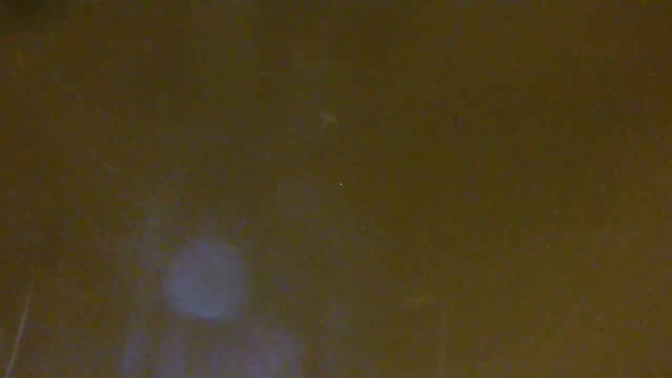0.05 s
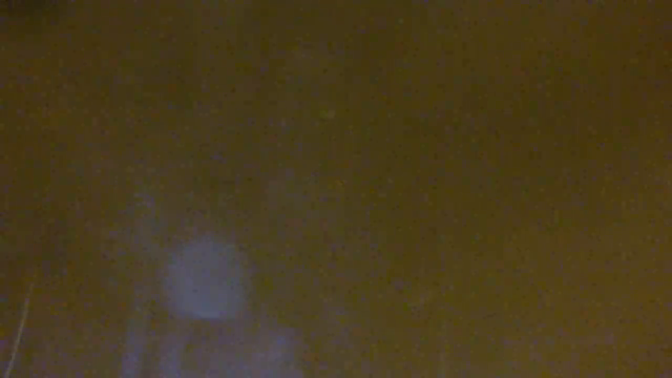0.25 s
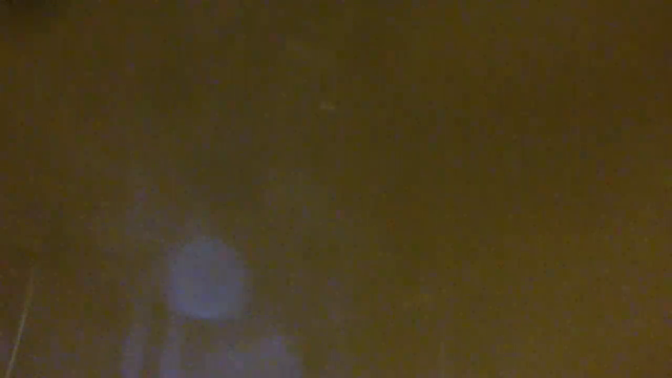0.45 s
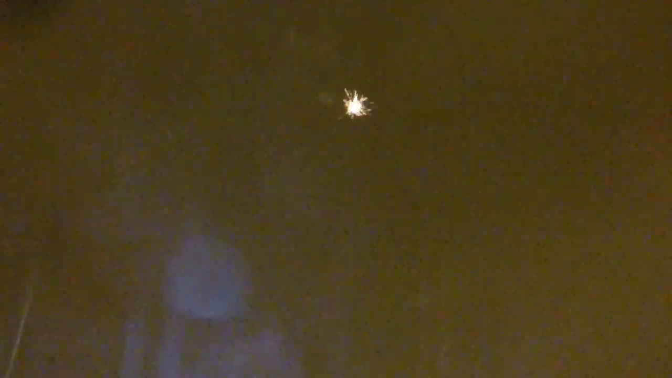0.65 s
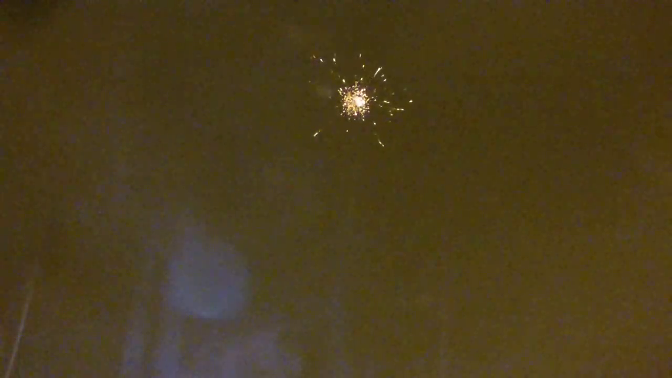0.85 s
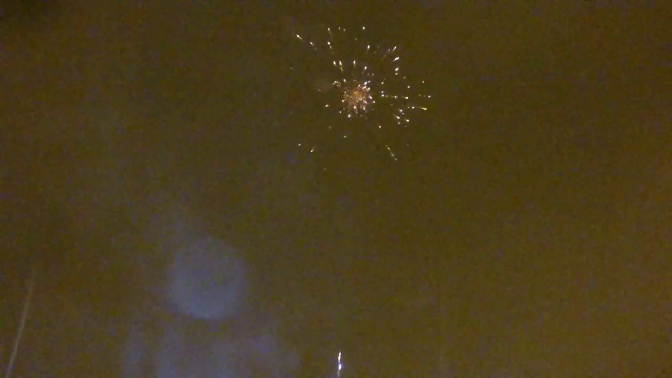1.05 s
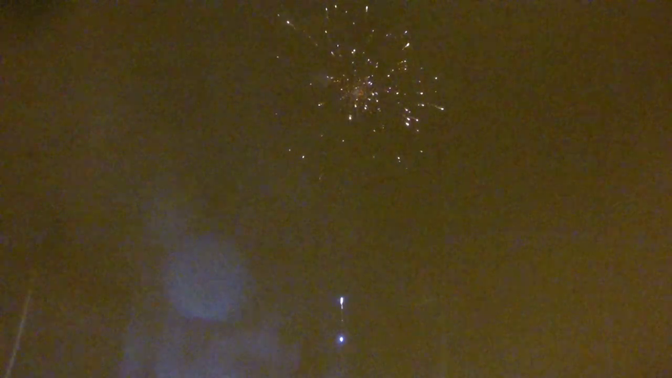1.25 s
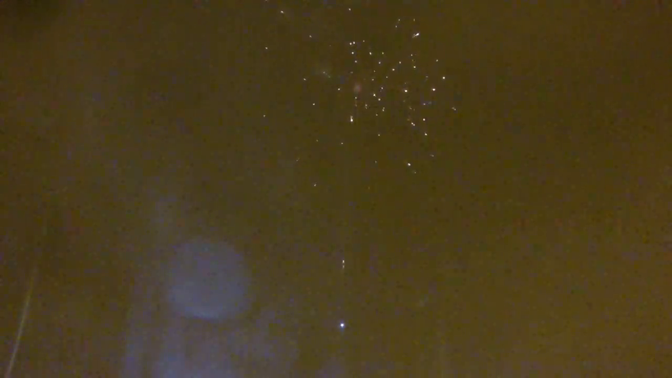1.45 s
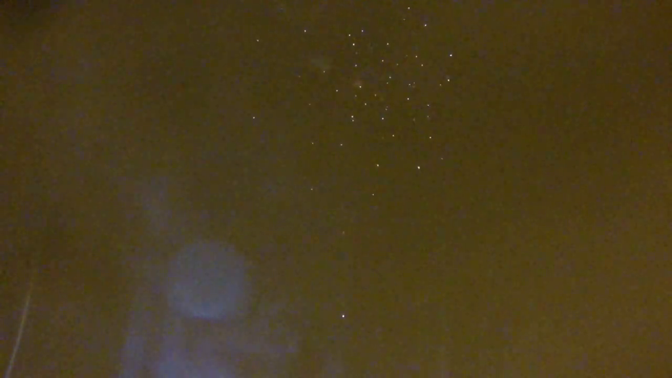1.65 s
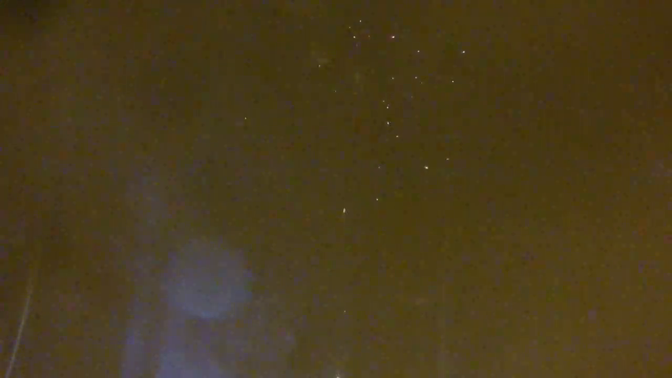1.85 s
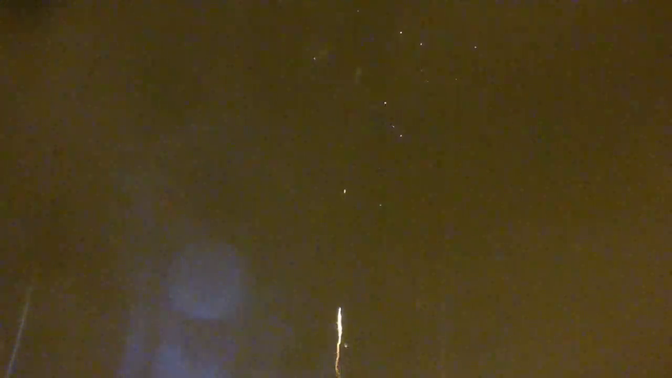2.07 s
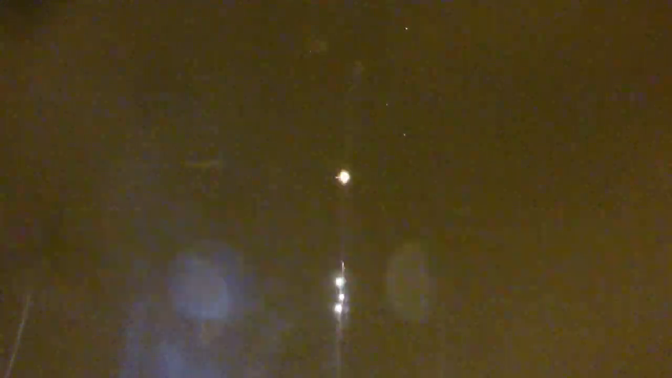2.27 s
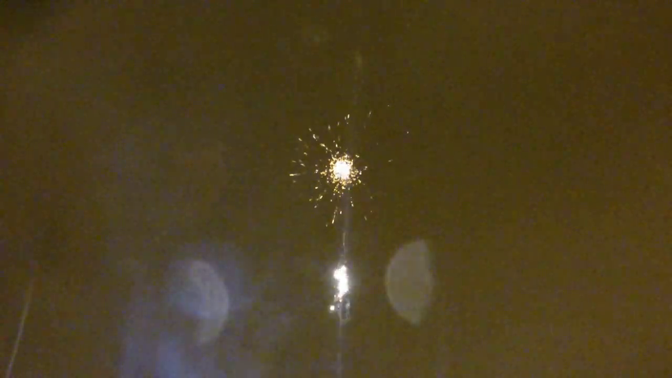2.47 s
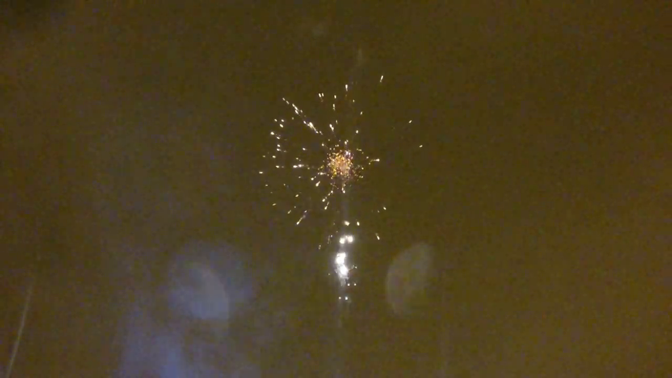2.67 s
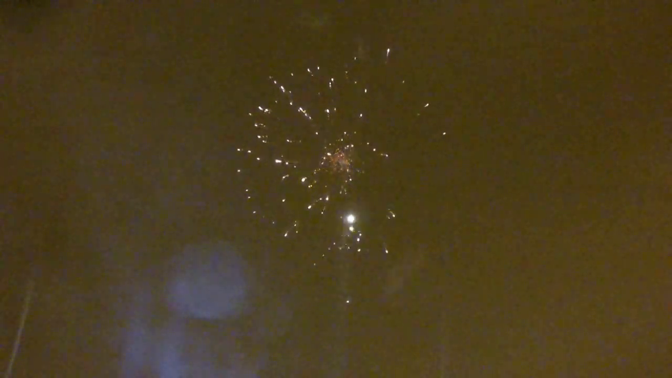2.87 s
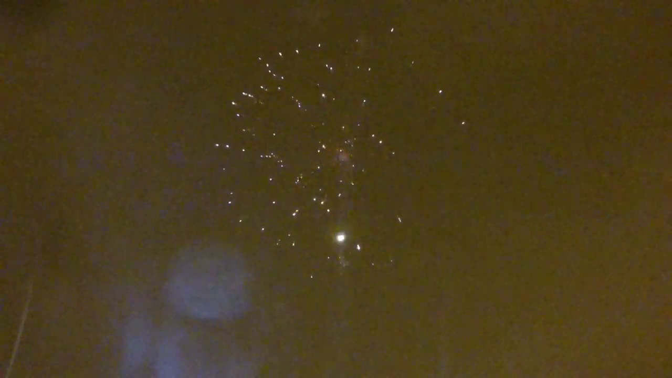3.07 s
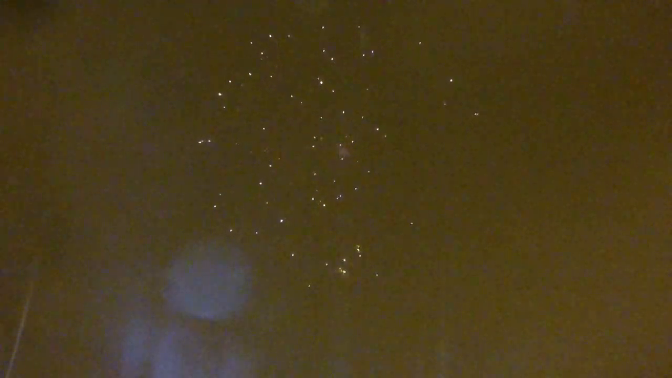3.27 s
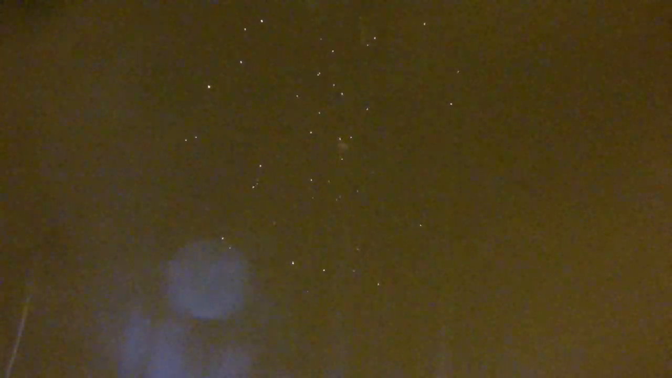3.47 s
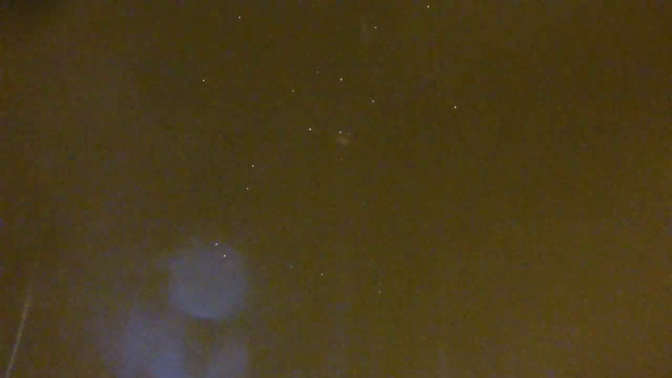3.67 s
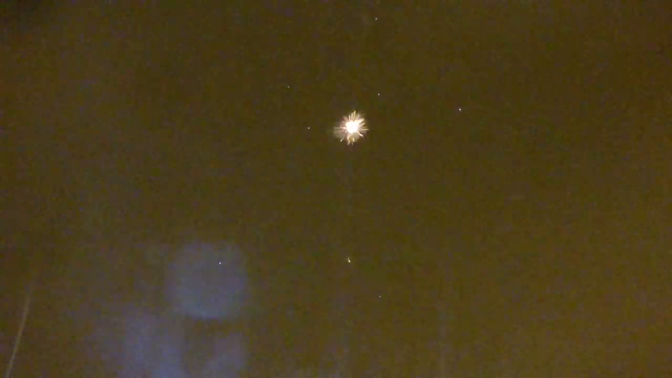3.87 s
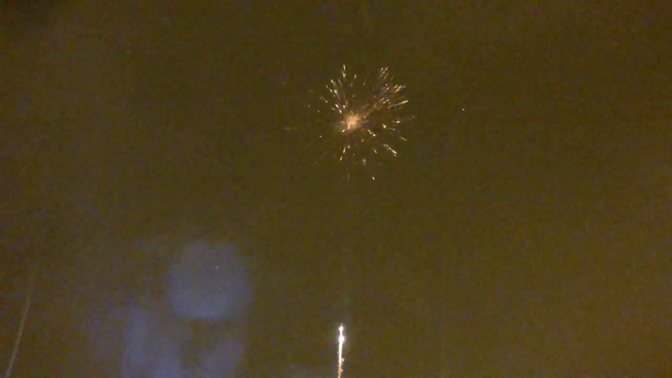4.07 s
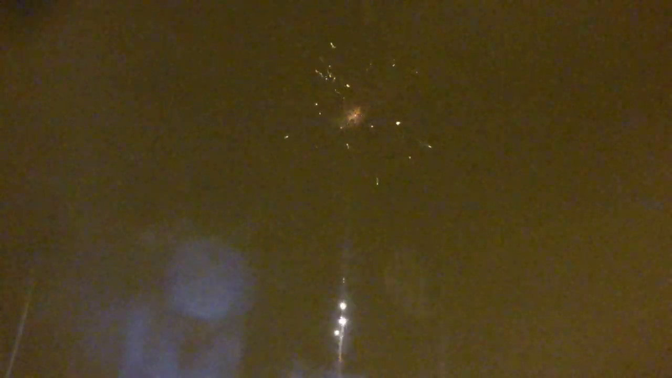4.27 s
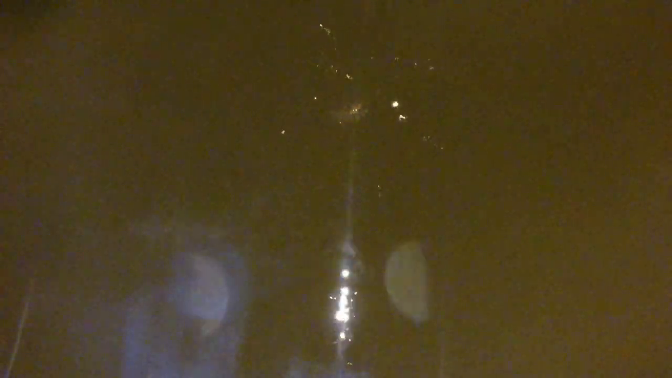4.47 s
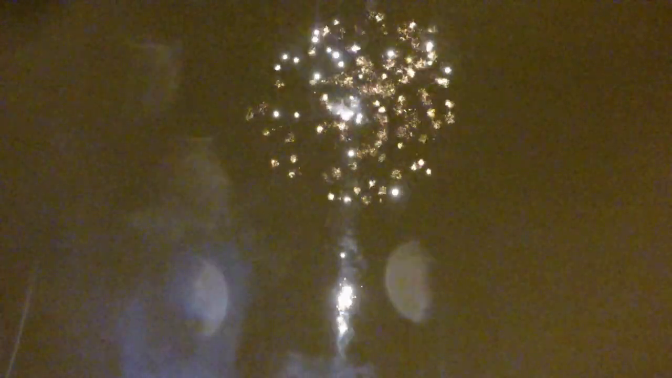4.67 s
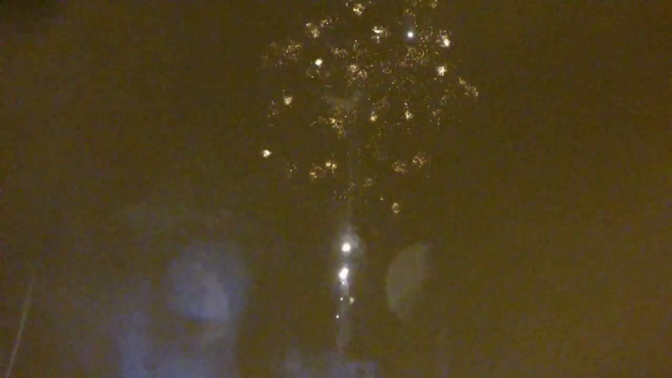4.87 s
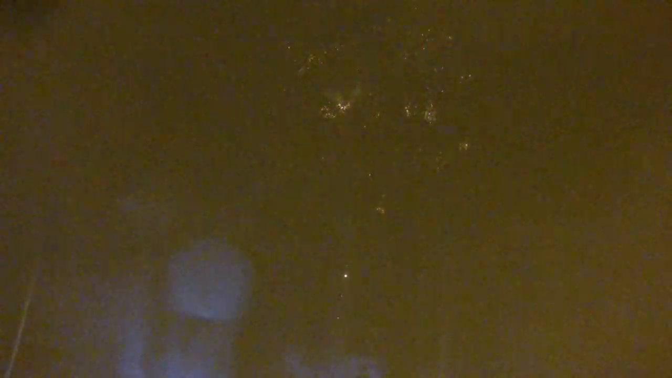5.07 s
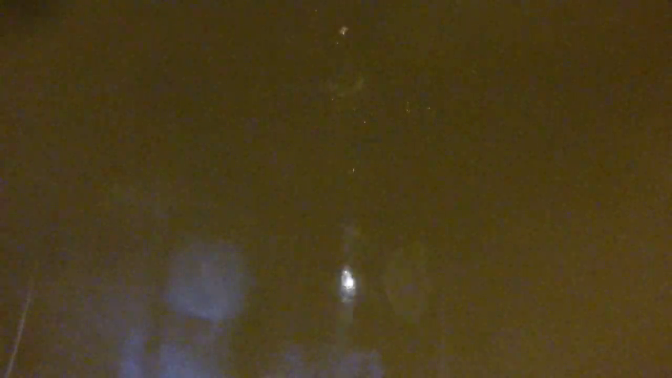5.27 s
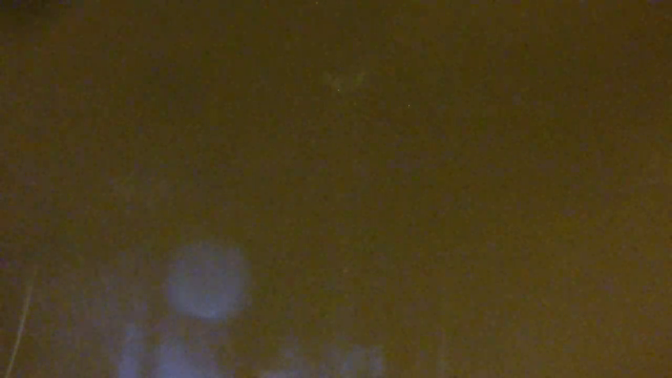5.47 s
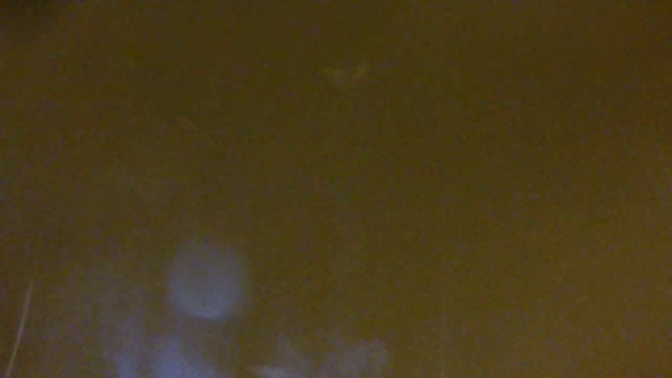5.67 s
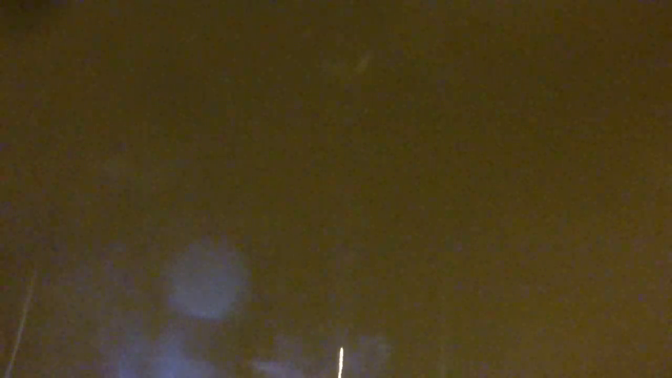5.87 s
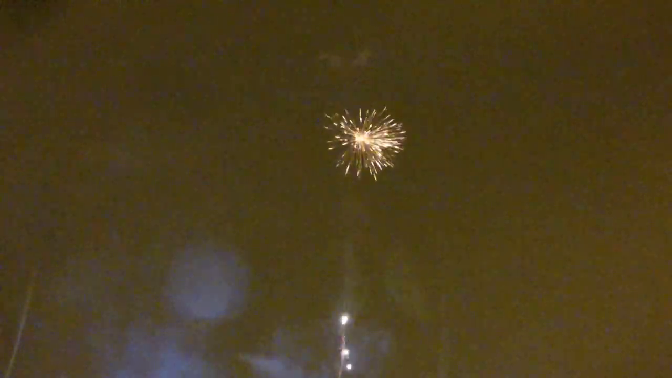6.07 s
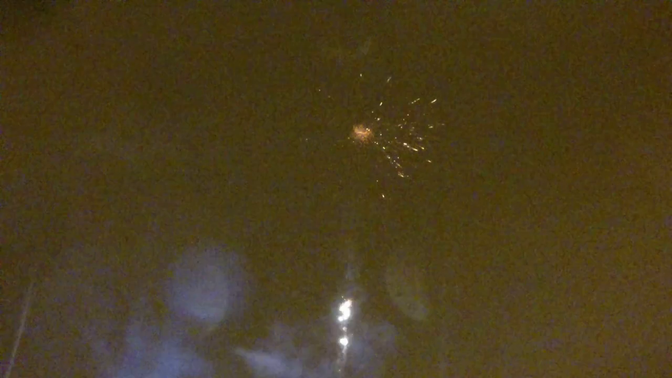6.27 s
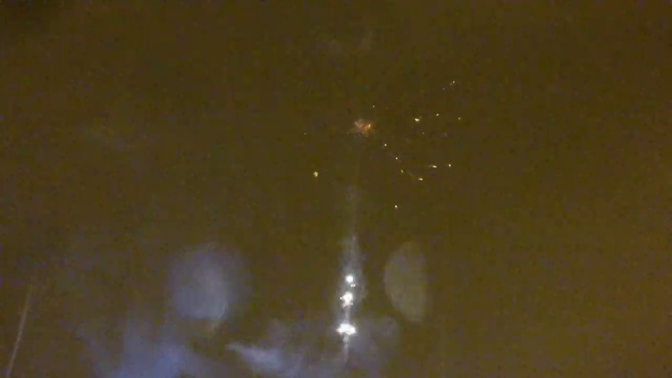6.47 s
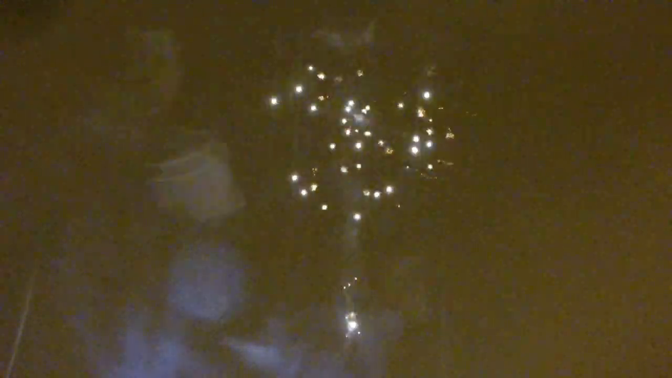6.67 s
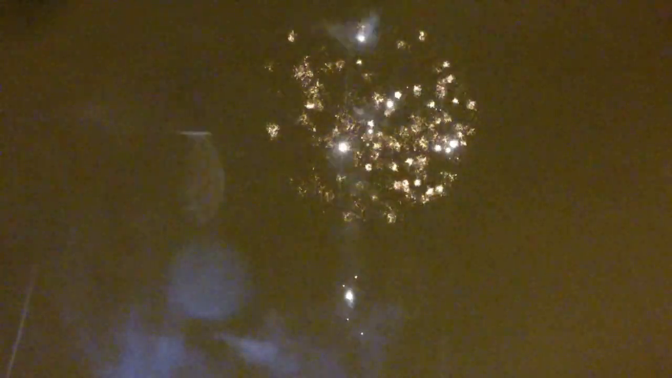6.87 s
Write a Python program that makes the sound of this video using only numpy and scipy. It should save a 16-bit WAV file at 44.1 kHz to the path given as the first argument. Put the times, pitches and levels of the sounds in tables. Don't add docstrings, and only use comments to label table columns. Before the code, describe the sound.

Fireworks at night: low wind hum, four sharp overhead bangs separated by dull launch thumps, the last three bangs accompanied by dense crackling swarms.

```python
import sys
import numpy as np
from scipy import signal
from scipy.fft import rfft, irfft, next_fast_len
from scipy.io import wavfile
from scipy.ndimage import map_coordinates

SR = 44100
rng = np.random.default_rng(int(sys.argv[2]) if len(sys.argv) > 2 else 0)


def field_ratio(decibels):
    return 10 ** (np.asarray(decibels, dtype=float) / 20)


def unload_audio(sound):
    columns = np.transpose(np.atleast_2d(sound))
    steps = np.round(np.clip(columns, -1, 1) * 32767)
    wavfile.write(sys.argv[1], SR, steps.astype(np.int16))


N = 305613

IDLE_HZ = 26.04
ENGINE_ORDERS = [(1, -60), (1.5, -57.5), (2.0, -45.5), (2.5, -53.5), (3, -40.5), (3.5, -60.5), (4, -75),
                 (5, -62), (7, -68)]
# t/s, level/dB, half length/s, f/Hz
GUSTS = [(0.117, -33.5, 0.236, 70.96), (0.693, -43.5, 0.42, 71.58), (0.931, -26.5, 0.076, 72),
         (1.523, -32, 0.136, 69.47), (1.66, -32.5, 0.107, 70.95), (1.922, -39.5, 0.33, 71.4),
         (2.2, -33.5, 0.11, 70), (2.57, -28.5, 0.185, 70.35), (2.82, -30, 0.42, 69.64),
         (2.94, -24.5, 0.1584, 69.25), (3.179, -28.5, 0.094, 74.66), (3.358, -27, 0.134, 68.64),
         (3.428, -27, 0.097, 70), (3.584, -28, 0.134, 69.84), (3.752, -35, 0.25, 70.97),
         (4.169, -29, 0.177, 69.94), (4.445, -34.5, 0.262, 70.85), (4.893, -32.5, 0.16, 69.56),
         (5.273, -42.5, 0.058, 71.8), (5.805, -28.5, 0.057, 70.34), (6.06, -40, 0.374, 69.2),
         (6.271, -26.5, 0.128, 71.8), (6.93, -46, 0.22, 69.4)]
GUST_RISE = 0.67
# f/Hz, level/dB per Hz
TOWN_HISS = [(15, -50), (30, -47.5), (60, -10), (86, -1), (104, -9), (130, -15), (270, -26), (976, -36.5),
             (2080, -35), (4810, -43.5), (5680, -49), (6300, -47), (13200, -58.5), (16000, -70.5)]
# f/Hz, level/dB, width/Hz
WHINES = [(5624, -76.5, 93), (11230, -90, 24), (14040, -88, 270)]
# f/Hz, level/dB rms
BUZZ_LINES = [(14147, -87), (14207, -85), (14266, -94)]

# t/s, level/dB
NEAR_TICK = (.3218, -7)
# f/Hz, width/Hz, level/dB
TICK_RING = [(2420, 474, 3.5), (5570, 720, -19), (8500, 550, -19.5)]
# t/s, peak level/dB
STRAYS = [(1.261, -42.5), (1.283, -51), (1.4277, -40), (1.458, -44), (2.2908, -45), (4.2767, -58.5),
          (3.452, -39), (5.2922, -31.5), (5.678, -39), (5.852, -39), (5.9474, -43), (6.0874, -55)]

# delay/ms, strength (negative turns the wave over)
NEAR_PATHS = [(0, .49), (.204, .55), (.36, 1.01), (.859, .72), (.969, .54), (1.16, -.36), (1.393, .35),
              (1.697, -.14), (2.297, .12), (2.757, .12)]
# f/Hz, sharpness
PORT = [(3490, 4.5), (6520, 3.1)]
# f/Hz, width/Hz, level/dB
HOUSING = [(2019, 334, -4), (3000, 56, -37.5), (4417, 164, -3.5), (5470, 610, -17.5)]
# f/Hz, width/Hz, level/dB
SHELL = [(8017, 2734, 7), (12380, 1730, -22)]
# f/Hz, width/Hz, level/dB
RIM = [(12550, 1420, 7)]

# t/s after the blast, level/dB, decay by 60 dB/s
WALLS = [(.009, -17, 0.00277), (0.031, -27, 0.0273), (0.083, -37, 0.0123), (0.093, -35.5, 0.066),
         (0.116, -37.5, .01), (.16, -34.5, 0.036), (0.166, -34.5, 0.0134)]
# f/Hz, decay by 60 dB/s
YARD = [(150, 0.643), (600, 0.0795), (2000, 0.1117), (5000, 0.079), (12000, 0.069)]
# f/Hz, decay by 60 dB/s
FIELD = [(300, 1.66), (2500, 3.57), (5000, 1.87), (12000, 1.46)]
# f/Hz, level/dB, decay by 60 dB/s
BOOM = [(97.7, -5.5, 0.217), (131.7, -14.5, 0.198), (197.1, -9, 0.081), (265.9, -4.5, 0.0648),
        (467.5, -27.5, 0.064)]

# t/s, peak level/dB, blast length/ms, boom level/dB, ducking/dB
BURSTS = [
    (0.8819, 0, 0.413, -15.5, 9),
    (2.5143, -0.5, 0.34, -19, 9),
    (4.1164, -1.5, 0.315, -16.5, 14.5),
    (6.2382, -0.5, 0.317, -17.5, 11),
]
# t/s, length/s, f/Hz, level/dB
WHISTLES = [
    (1.8, 0.082, 6530, -71.5),
    (3.445, .045, 1604, -55),
    (4.13, 0.045, 1860, -50),
]
# t/s, peak level/dB, boom level/dB
LIFTS = [
    (1.843, -26.5, -13.5),
    (3.8785, -28, -9.5),
    (5.7669, -23, -15),
]

# t/s, peak level/dB
EARLY_STARS = [(2.2468, -36), (2.2495, -36), (2.335, -34), (2.3838, -27), (2.4195, -21), (2.434, -35),
               (2.4402, -34), (2.4441, -26), (2.463, -19), (2.486, -32), (2.4976, -23), (2.5071, -22),
               (4.3095, -39), (4.339, -37), (4.3641, -36), (4.3946, -35), (4.4235, -31), (4.4494, -28),
               (4.4549, -31), (4.459, -28), (4.4668, -31), (4.471, -27), (4.4829, -26), (6.1508, -28),
               (6.163, -32), (6.3065, -38), (6.3212, -29), (6.3277, -35), (6.3346, -31), (6.3471, -33)]
# t/s, peak level/dB
FIRST_STARS = [(2.5522, -30), (2.5586, -29), (2.5768, -27), (2.5902, -24), (2.6167, -27), (2.6234, -26),
               (2.6552, -25), (2.6714, -25), (2.6871, -25), (2.7067, -24), (2.7139, -23), (2.7481, -20),
               (2.7835, -23), (2.7873, -23), (2.8112, -22), (2.8137, -21), (2.8309, -19), (2.8461, -23),
               (2.8712, -22), (2.9044, -22), (2.919, -21), (2.9594, -21), (2.9769, -20), (2.9938, -22),
               (3.0084, -19), (3.0172, -21), (3.0216, -23), (3.0396, -21), (3.0447, -26), (3.0613, -21)]
# t/s, peak level/dB
SECOND_STARS = [(4.5186, -26), (4.5283, -26), (4.5453, -25), (4.6016, -24), (4.6305, -22), (4.65, -21),
                (4.6766, -22), (4.6947, -18), (4.7361, -19), (4.7414, -17), (4.7608, -18), (4.7709, -18),
                (4.7889, -16), (4.8056, -16), (4.8217, -16), (4.8367, -15), (4.9082, -15), (4.9133, -14),
                (4.9328, -15), (4.9746, -16), (4.9899, -17), (5.0085, -18), (5.0238, -18), (5.0463, -18),
                (5.0698, -23), (5.087, -18), (5.092, -19), (5.1082, -21), (5.1169, -14), (5.1227, -22)]
# t/s, peak level/dB
THIRD_STARS = [(6.3865, -28), (6.4106, -27), (6.4683, -23), (6.4813, -23), (6.5173, -26), (6.5287, -23),
               (6.5534, -25), (6.5624, -24), (6.583, -23), (6.6043, -24), (6.6322, -21), (6.6494, -22),
               (6.6824, -22), (6.6953, -19), (6.7244, -16), (6.7309, -20), (6.7375, -21), (6.7579, -20),
               (6.7688, -19), (6.7938, -21), (6.812, -23), (6.8404, -21), (6.8466, -22), (6.8568, -21),
               (6.8746, -23), (6.8849, -20), (6.8992, -22), (6.9131, -18), (6.9218, -19), (6.9277, -21)]
# t/s, peak level/dB
LATE_STARS = [(3.0878, -17), (3.1082, -22), (3.1193, -17), (3.1537, -21), (3.1595, -18), (3.1706, -24),
              (3.1771, -22), (3.1915, -20), (3.2155, -18), (3.264, -18), (3.2673, -16), (3.3026, -21),
              (3.3468, -21), (3.3673, -18), (3.4381, -17), (3.6575, -18), (4.0373, -16), (5.1388, -10),
              (5.1509, -23), (5.1578, -23), (5.1803, -25), (5.1932, -18), (5.2186, -28), (5.2259, -20),
              (5.2351, -20), (5.343, -15), (5.4114, -20), (5.4529, -27), (5.4976, -17), (5.5067, -17)]
# busiest t/s, rise/s, fall/s, rate/pops a second, level/dB
SWARMS = [
    (2.88, 0.306, 0.1274, 227.4, -24.5),
    (4.8, .33, 0.277, 240, -20.5),
    (4.885, .12, .11, 750, -21),
    (6.72, .42, .1, 220, -23.5),
]
# t/s, half length/s
LULLS = [(2.645, 0.00678), (2.757, 0.005105), (2.9, 0.00587), (4.495, .007), (4.667, 0.00381),
         (4.688, 0.00386), (4.755, .005), (4.858, .004), (5.029, 0.00531), (6.5, 0.00662), (6.538, 0.00749),
         (6.703, 0.00662), (6.774, 0.00752), (6.821, 0.0077)]
# blast length/ms, stretch of the near paths
STAR_KINDS = [(.05, .97), (.065, 0.992), (.08, 1.015), (.095, 0.9872)]

# f/Hz, level/dB
TOP_EDGE = [(14600, 0), (15100, -11.5), (15450, -5.5), (15800, -31)]


def unit(x):
    return x / np.sqrt(np.mean(x ** 2) + 1e-20)


def along(points, hz):
    f, v = np.transpose(points)
    return np.interp(np.log(hz + 1), np.log(f + 1), v)


def wobble(rate):
    knots = rng.standard_normal(int(N * rate / SR) + 4)
    return map_coordinates(knots, [np.arange(N) * rate / SR])


def filtered(x, response):
    m = next_fast_len(N + SR // 2)
    return irfft(rfft(x, m) * response(np.fft.rfftfreq(m, 1 / SR)), m)[..., :N]


def drone():
    t = np.arange(N) / SR
    engine = np.zeros(N)
    for order, db in ENGINE_ORDERS:
        level = field_ratio(db + 0.395 * wobble(4.36))
        engine += level * np.sin(2 * np.pi * (order * IDLE_HZ * t + rng.random()))
    hum = np.zeros(N)
    for s, db, half, hz in GUSTS:
        near = slice(max(round((s - 2 * half) * SR), 0), round((s + 2 * half) * SR))
        u = t[near] - s
        side = np.where(u < 0, GUST_RISE * half, half)
        hum[near] += field_ratio(db - 20.6 * (u / side) ** 2) * np.cos(2 * np.pi * hz * u)
    return np.sqrt(2) * (engine + hum)


def night():
    hiss = unit(filtered(rng.standard_normal(N), lambda f: field_ratio(along(TOWN_HISS, f))))
    thin = np.zeros(N)
    for hz, db, width in WHINES:
        band = filtered(rng.standard_normal(N), lambda f: 1 / (1 + ((f - hz) / width) ** 2))
        thin += field_ratio(db) * unit(band)
    for hz, db in BUZZ_LINES:
        thin += field_ratio(db + 3) * np.sin(2 * np.pi * hz * np.arange(N) / SR)
    breathing = field_ratio(-47 + 0.86 * wobble(1.447) + 0.15 * wobble(13))
    return breathing * hiss + thin


def spikes(s, db):
    samples = np.round(np.asarray(s) * SR).astype(int)
    return np.bincount(np.clip(samples, 0, N - 1), field_ratio(db), N)


def resonances(hz, modes):
    return sum(field_ratio(db) * 1j * hz * w / (c * c - hz * hz + 1j * hz * w) for c, w, db in modes)


def notch(hz, centre_hz, depth, width):
    x = 1j * hz / centre_hz
    return (x ** 2 + depth * width * x + 1) / (x ** 2 + width * x + 1)


def arrival(hz, length_ms, stretch=1, shell_db=-18, null=0.956, rim_db=-20):
    s = 2j * np.pi * hz
    blast = -s / (1 + s * length_ms / 1000) ** 2 * notch(hz, 953, null, 0.886)
    blast /= 1 + 150 / (1j * hz + 1) - (110 / (hz + 1)) ** 2
    paths = sum(g * np.exp(-s * ms * stretch / 1000) for ms, g in NEAR_PATHS)
    port = np.prod([1 / (1 - (hz / c) ** 2 + 1j * hz / c / q) for c, q in PORT], axis=0)
    inlet = port + field_ratio(shell_db) * resonances(hz, SHELL)
    inlet = inlet * notch(hz, 8073, 0.112, 0.093) * notch(hz, 4041, 0.589, 0.158)
    ring = port * resonances(hz, HOUSING)
    late_ring = ring * np.exp(-s * 0.0013854)
    through_shell = field_ratio(shell_db - 2.0) * resonances(hz, SHELL[:1])
    rim = field_ratio(rim_db) * resonances(hz, RIM)
    direct = blast * (paths * inlet + late_ring + through_shell + rim)
    diffuse = blast * (1.459 * inlet + 2.54 * ring) * notch(hz, 3560, 0.742, 1.0)
    return np.array([direct, diffuse]) / np.abs(irfft(direct)).max()


def strays():
    tick = filtered(spikes([NEAR_TICK[0]], [NEAR_TICK[1]]), lambda hz: -resonances(hz, TICK_RING))
    smear = rng.standard_normal(500) * field_ratio(-.07 * np.arange(500))
    smear *= field_ratio(2.5) / np.linalg.norm(smear)
    crackles = np.convolve(spikes(*np.transpose(STRAYS)), smear)[:N]
    return tick + filtered(crackles, lambda hz: arrival(hz, 0.276)[1] / (1 + 1400 / (1j * hz + 1)) ** 2)


def ducking():
    t = np.arange(N) / SR
    drop_db = np.zeros(N)
    for s, *_, db in BURSTS:
        onset = np.clip((t - s) / 0.0293 + 1, 0, 1)
        drop_db += db * onset * np.exp(-np.abs(t - s) / 0.326)
    return field_ratio(-drop_db)


def scatter(decay, start):
    hz, t, z = signal.stft(rng.standard_normal(3 * SR // 2), SR, nperseg=256)
    fading = z * field_ratio(-60 * t / along(decay, hz)[:, None])
    tail = signal.istft(fading, SR, nperseg=256)[1]
    return np.pad(tail / np.linalg.norm(tail), (round(start * SR), 0))


def outdoors(x, yard_db, field_db):
    t = np.arange(SR // 10) / SR
    space = np.zeros(2 * SR)
    for s, db, t60 in WALLS:
        smear = field_ratio(-60 * t / t60) * rng.standard_normal(len(t))
        space[round(s * SR):][:len(t)] += field_ratio(db) * smear / np.linalg.norm(smear)
    for decay, db, start in (YARD, yard_db, .0015), (FIELD, field_db, .03):
        tail = scatter(decay, start)
        space[:len(tail)] += field_ratio(db) * tail
    direct, diffuse = x
    return direct + signal.fftconvolve(diffuse, space)[:N]


def boom(s, db):
    t = np.arange(SR // 4) / SR
    ring = np.zeros(len(t))
    for hz, mode_db, t60 in BOOM:
        level = field_ratio(mode_db + rng.normal(0, 1.43) - 60 * t / t60)
        ring += level * np.sin(2 * np.pi * hz * t)
    return signal.fftconvolve(spikes([s], [db]), -ring)[:N]


def bursts():
    out = np.zeros(N)
    for s, db, ms, boom_db, _ in BURSTS:
        blast = filtered(spikes([s], [db]),
                         lambda hz: arrival(hz, ms, shell_db=-10, null=0.558, rim_db=-32.5))
        out += outdoors(blast, yard_db=-16, field_db=-28.0) + boom(s, db + boom_db)
    return out


def whistles():
    out = np.zeros(N)
    for s, length, hz, db in WHISTLES:
        u = np.arange(round(length * SR)) / (length * SR)
        turns = np.cumsum(hz - 86.4 * u ** 2) / SR
        tone = np.sqrt(np.sin(np.pi * u)) * np.sin(2 * np.pi * turns)
        out[round(s * SR):][:len(u)] += field_ratio(db) * tone
    return out


def lifts():
    out = np.zeros(N)
    u = np.arange(SR // 50) / SR * 1000 / 0.77
    push = (u - 1) * np.exp(-u) * (1 - np.exp(-6 * u))
    for s, db, boom_db in LIFTS:
        puff = rng.standard_normal(200) * field_ratio(-.2 * np.arange(200))
        puffs = np.convolve(spikes([s], [db - 15.5]), puff)[:N]
        side = filtered(puffs, lambda hz: arrival(hz, 0.079) * notch(hz, 7500, 0.57, 0.42))[1]
        shove = signal.fftconvolve(spikes([s], [db + 1.5]), push)[:N]
        out += outdoors([side, side], yard_db=-5, field_db=-9) + shove + boom(s, db + boom_db)
    return out


def swarms():
    weaker_early_db, size_spread_db, uneven_gaps = 8.5, -1, 0.55
    t, times, levels = np.arange(N) / SR, [], []
    busy = np.prod([np.clip(np.abs(t - at) / half - .5, 0, 1) ** 2 for at, half in LULLS], axis=0)
    for busiest, rise, fall, rate, db in SWARMS:
        away = (t - busiest) / np.where(t < busiest, rise, fall)
        popped = np.cumsum(rate * np.exp(-away ** 4) * busy) / SR
        shift, size = rng.standard_normal(400), rng.random(400)
        turn = np.arange(1, 401) + uneven_gaps * shift
        lit = (turn > .5) & (turn < popped[-1] - .5)
        when = np.interp(turn[lit], popped, t)
        early_db = weaker_early_db * np.minimum(np.interp(when, t, away), 0)
        times.append(when)
        levels.append(db + early_db + size_spread_db * np.log(size[lit]))
    return np.concatenate(times), np.concatenate(levels)


def stars():
    single = np.transpose(EARLY_STARS + FIRST_STARS + SECOND_STARS + THIRD_STARS + LATE_STARS)
    s, db = np.c_[single + [[0], [1.5]], swarms()]
    kind = rng.integers(4, size=len(s))
    out = np.zeros(N)
    for k, (ms, stretch) in enumerate(STAR_KINDS):
        pops = filtered(spikes(s[kind == k], db[kind == k]), lambda hz: arrival(hz, ms, stretch))
        out += outdoors(pops, yard_db=-12, field_db=-31)
    return out


def scene():
    fireworks = lifts() + bursts() + stars() + strays() + whistles()
    background = ducking() * (drone() + night())
    return (fireworks + background)[None]


def top_cut(x):
    return signal.sosfilt(signal.butter(12, 16500, fs=SR, output="sos"), x)


def record(dry):
    soft = dry / (1 + np.abs(dry / 1.3) ** 8) ** (1 / 8)
    cut = filtered(soft, lambda hz: field_ratio(along(TOP_EDGE, hz)))
    mix = np.clip(cut, -1, 1)
    return top_cut(mix)


dry = scene()
out = record(dry)
unload_audio(out)
```